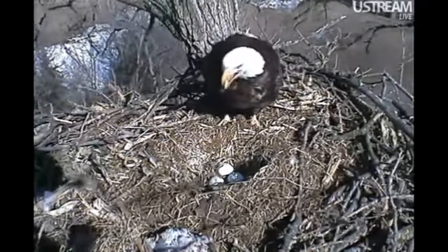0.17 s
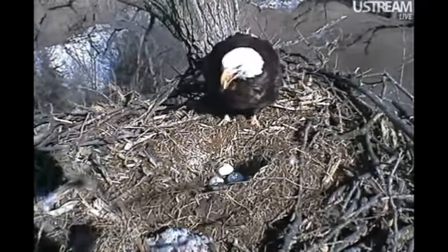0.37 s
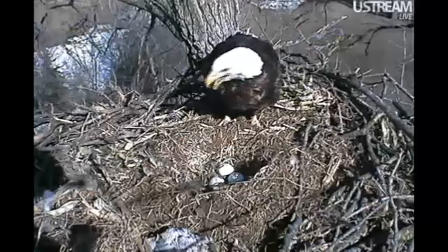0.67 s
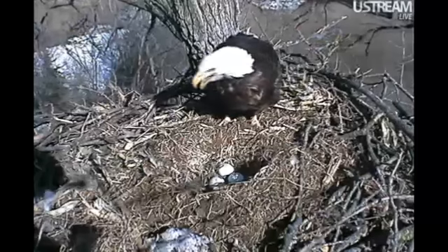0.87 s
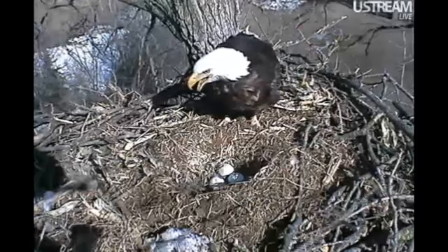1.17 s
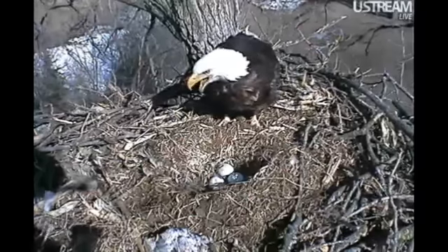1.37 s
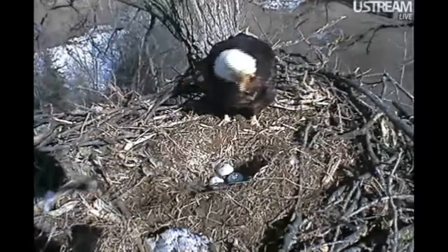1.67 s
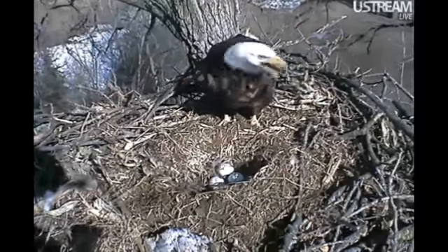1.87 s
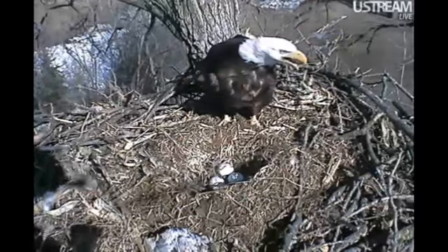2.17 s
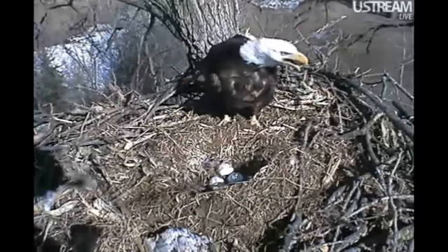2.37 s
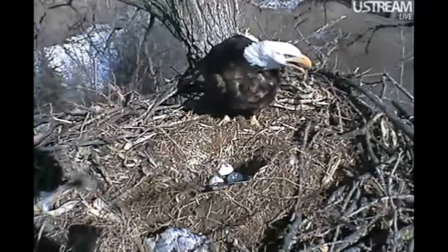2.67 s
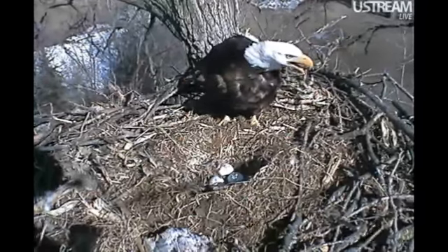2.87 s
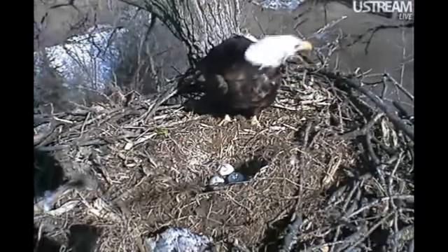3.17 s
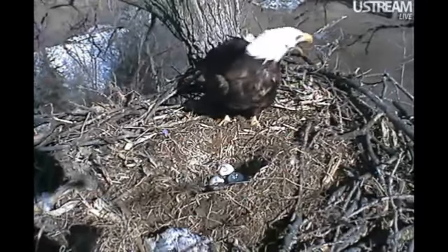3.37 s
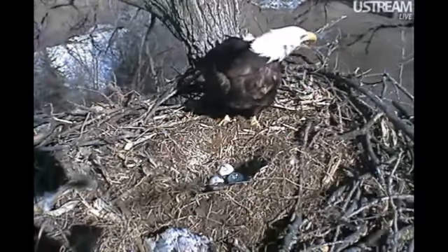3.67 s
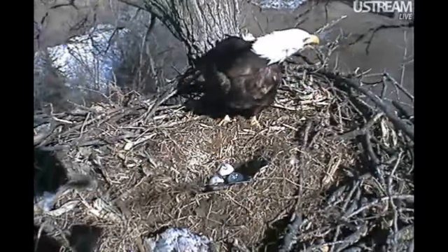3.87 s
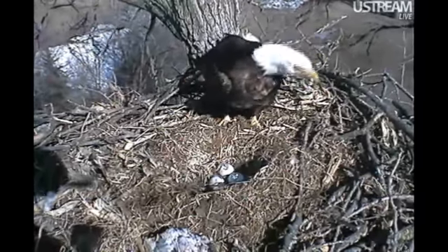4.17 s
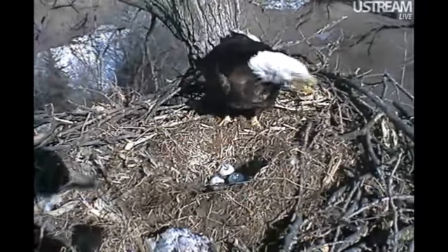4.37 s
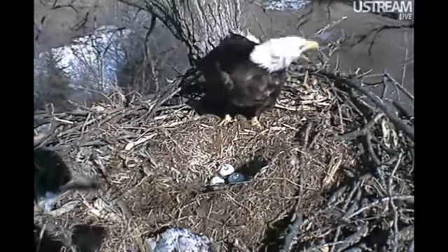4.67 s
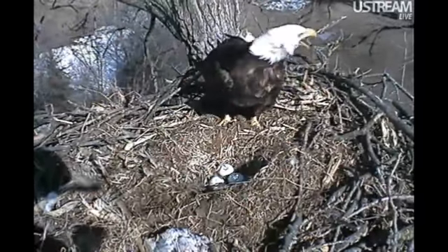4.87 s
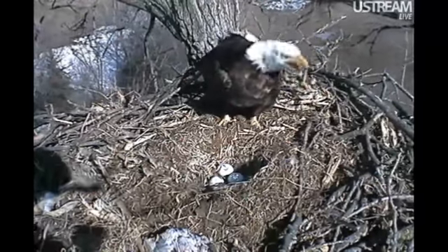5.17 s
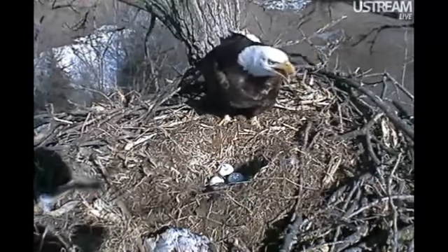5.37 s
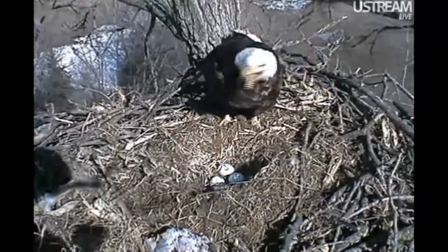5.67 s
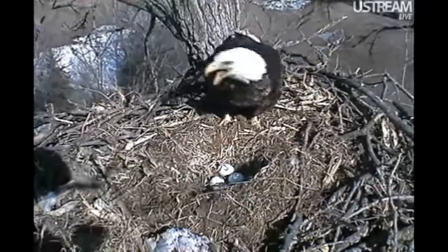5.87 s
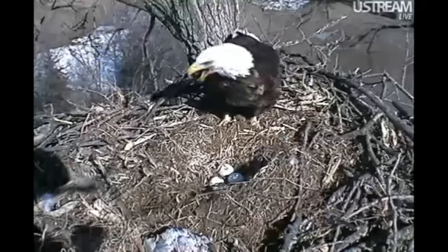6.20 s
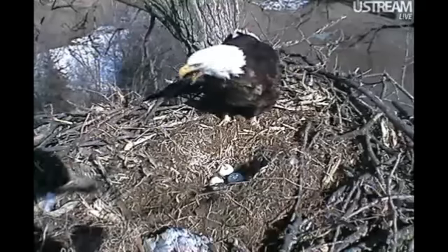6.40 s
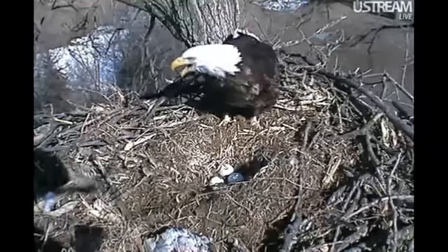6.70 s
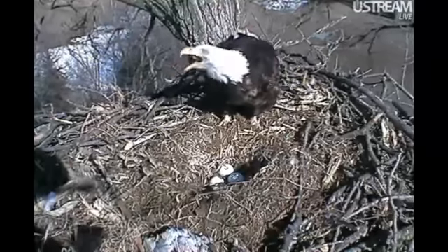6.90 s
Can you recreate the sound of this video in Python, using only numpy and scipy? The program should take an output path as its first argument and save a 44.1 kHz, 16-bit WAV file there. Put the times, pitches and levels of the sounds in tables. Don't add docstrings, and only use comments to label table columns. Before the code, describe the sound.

A bald eagle at its nest gives bouts of rapid, piercing whistled chitters while gusty wind rumbles and overloads a small outdoor microphone.

```python
import sys
import numpy as np
from scipy import signal
from scipy.fft import dct
from scipy.io import wavfile
from scipy.ndimage import uniform_filter1d

SR = 44100
rng = np.random.default_rng(int(sys.argv[2]) if len(sys.argv) > 2 else 0)


def wav_out(sig):
    wavfile.write(sys.argv[1], SR, np.round(np.clip(np.atleast_2d(sig).T, -1, 1) * 32767).astype(np.int16))


def how_loud(loudness_db):
    steps = np.asarray(loudness_db, float) / 20
    return 10 ** steps


N = 310464
RAIL = .026


def butter(x, order, hz, kind="low"):
    return signal.sosfilt(signal.butter(order, hz, kind, fs=SR, output="sos"), x)


def drift(rate_hz):
    r = np.exp(-2 * np.pi * rate_hz / SR)
    slow = signal.lfilter([1], [1, -2 * r, r * r], rng.standard_normal(N + SR))[SR:]
    return slow / slow.std()


# t/s, length/ms, resting f/Hz, level before overload/dB, closing dive/Hz
BOUT_1 = [(0.0005, 8, 3950, -28, 99.8), (.065, 9.5, 4650, -20.5, 60), (.0748, 3.4, 3266, -24.5, 30),
          (.079, 13.2, 4050, -19.5, 99.9), (.158, 12, 4670, -22, 698), (.170, 6.7, 3080, -25, 104),
          (.174, 13.7, 3920, -19.5, 243), (.2545, 6, 4020, -24, 120), (.2605, 7.5, 3800, -22, 300),
          (.2675, 6.5, 3080, -33, 200), (.2755, 8.9, 3830, -30, 300), (.356, 6.8, 4070, -32, 101.3)]
BOUT_2 = [(1.480, 7, 3880, -24, 50), (1.490, 5.7, 3286, -27.5, 31), (1.4945, 8.3, 3930, -21, 60),
          (1.508, 3, 3750, -34, 30), (1.514, 13, 3930, -29, 30), (1.587, 11, 4780, -21, 99.2),
          (1.597, 9.1, 4190, -27.5, 99.9), (1.605, 10, 4950, -27.5, 99), (1.615, 19.4, 4040, -24.5, 401),
          (1.700, 4, 4650, -26, -200), (1.704, 7.5, 5000, -21, 500), (1.711, 3.6, 3706, -14, 30),
          (1.716, 15.7, 4260, -22, 500), (1.731, 7.8, 3150, -34.5, 248), (1.811, 14.5, 3950, -15.5, 120),
          (1.829, 11, 3220, -25, 100), (1.924, 14, 3060, -24, 100), (2.025, 12, 2890, -31, 80)]
BOUT_3 = [(3.1003, 13.4, 4440, -23.5, 500), (3.1157, 6.5, 3950, -19.5, 50.8), (3.121, 16, 4600, -25.5, 600),
          (3.132, 14.3, 3830, -22.5, 353), (3.210, 7.9, 4740, -35, 300), (3.219, 8.2, 4900, -29.5, 690),
          (3.233, 10.5, 4700, -34, 300), (3.246, 6.8, 4720, -32, 300), (3.325, 6, 4450, -23.5, 29.94),
          (3.331, 9, 4800, -25.5, 520), (3.340, 10, 4850, -25, 802.4), (3.354, 16, 3960, -22, 150),
          (3.441, 8, 3750, -31, 30.3), (3.448, 9.3, 4500, -31.5, 500), (3.458, 13, 3800, -21, 80),
          (3.555, 9, 3560, -22, 50), (3.563, 11, 3560, -25, 80), (3.577, 7.2, 3550, -39.5, 99.8)]
BOUT_4 = [(4.475, 6, 3850, -51, 30), (4.482, 12, 3740, -30, 100), (4.498, 18, 3720, -33, 150),
          (4.518, 9, 3500, -48, 30), (4.569, 9, 4850, -31, 600), (4.578, 6.7, 3950, -27.5, 100),
          (4.585, 10, 4820, -27.5, 707), (4.595, 7, 3334, -36, 100.3), (4.602, 14, 3844, -36.5, 504),
          (4.676, 8, 4350, -29.5, 50.2), (4.684, 4, 4900, -37, 30), (4.687, 6, 5600, -38, 200),
          (4.694, 4, 4000, -29.5, 29.56), (4.699, 15, 4750, -35, 1375), (4.772, 8, 4550, -30.5, 600),
          (4.780, 5, 3800, -36, -100), (4.785, 11, 4000, -28, -100), (4.875, 13.5, 3780, -31, 50),
          (4.890, 7, 3600, -36, 30), (4.898, 7, 3650, -35, 99.9), (4.906, 7, 3550, -38, 30),
          (4.974, 11, 3530, -31.5, 30), (4.987, 8, 3520, -33.5, 30), (4.996, 4, 3550, -43, 30),
          (5.060, 12, 2850, -52, 30), (5.078, 8, 2850, -53, 30)]
BOUT_5 = [(5.747, 6, 3920, -45, -100), (5.753, 7.5, 4080, -29, -200), (5.760, 13.3, 4387, -19.5, 30.13),
          (5.774, 25, 3940, -17.5, 50), (5.799, 16, 3760, -17.5, 160), (5.817, 6, 3700, -40, 29.7),
          (5.873, 9, 4750, -24.5, -150), (5.8875, 11.5, 5750, -28, 900), (5.899, 3.8, 3900, -30, 99),
          (5.903, 14, 4800, -24.5, 904), (5.917, 5.9, 3430, -32, 300), (5.984, 6, 4550, -23, -300),
          (5.990, 7, 5100, -29, 1000), (5.997, 3.5, 3950, -24, 30), (6.0005, 12.5, 4820, -18, 900),
          (6.013, 15, 3955, -23, 300), (6.028, 5, 3930, -28.5, 99.6), (6.092, 6.8, 3797, -27.5, 49.34),
          (6.097, 11.4, 4790, -22, 1092), (6.107, 5, 3800, -24, -100), (6.112, 14.5, 3960, -22, 120),
          (6.1941, 15.6, 3760, -23, 260), (6.211, 13.5, 3760, -28, 100), (6.303, 5, 4150, -31, 150),
          (6.308, 10, 3900, -28, 250), (6.319, 6, 3150, -42, 60), (6.326, 11, 3000, -37.5, 100),
          (6.405, 18, 3060, -32, 80), (6.498, 15, 2880, -43.5, 30)]
BOUT_6 = [(6.8726, 15, 5560, -29, 900), (6.8871, 5.5, 4500, -30, 100.3), (6.896, 8.2, 3950, -22, 100.2),
          (6.905, 4.6, 5440, -33.5, 30.1), (6.911, 3.9, 4400, -25, 300), (6.916, 4.6, 3900, -22, 29.9),
          (6.9195, 3.7, 4800, -35, 98.2), (6.924, 4.7, 4600, -24, 198.5), (6.93, 7.5, 4500, -28.5, 30),
          (6.94, 3.9, 4640, -33, 300), (7.003, 4, 5100, -25.5, 907), (7.005, 6, 4250, -27.5, 198),
          (7.014, 3.7, 4300, -24.5, 506), (7.021, 4, 4000, -29.5, 1190), (7.032, 5, 2600, -30, 100),
          (7.037, 3, 4100, -34, 300)]


def strokes(rows):
    scoop_share, scoop_max_ms, dive_share, dive_max_ms = .24, 2.8, .33, 5.8
    join_ms = 3
    fresh_ms, fresh_scoop_hz, fresh_loss_db = 2.0, 160, 6.5
    slide_loss_db, slide_loss_db_per_khz = 2.5, 7.5
    arch_max_hz, arch_share, sag_hz_per_ms = 120, .35, 9
    release_ms, release_loss_db = 7, 18.5
    crack_ms, crack_hz, crack_db = 5, 2600, -45

    steps, last_s, last_hz, last_db = [], -1, 0, 0
    for s, ms, hz, db, dive_hz in rows:
        scoop_ms = min(scoop_share * ms, scoop_max_ms)
        dive_ms = min(dive_share * ms, dive_max_ms)
        from_hz = last_hz
        loss_db = slide_loss_db + slide_loss_db_per_khz * abs(hz - from_hz) / 1000
        gap_s = s - last_s
        if gap_s * 1000 > join_ms:
            from_hz, loss_db = hz - fresh_scoop_hz, fresh_loss_db
            scoop_ms = min(scoop_ms, fresh_ms)
            if last_s > 0:
                trail_ms = min(release_ms, gap_s * 400)
                steps.append((last_s, trail_ms, last_hz, last_hz, last_db - release_loss_db))
            if 4500 < hz < 5300 and gap_s > crack_ms / 500:
                steps.append((s - crack_ms / 1000, crack_ms, hz + crack_hz, hz, crack_db))

        arch_hz = arch_max_hz * min(abs(hz - from_hz) / fresh_scoop_hz, 1)
        rest_ms = ms - scoop_ms - dive_ms
        climb_ms = arch_share * rest_ms
        sag_ms = rest_ms - climb_ms
        sagged_hz = hz - sag_hz_per_ms * sag_ms
        dive_loss_db = slide_loss_db + slide_loss_db_per_khz * abs(dive_hz) / 1000
        last_s, last_hz, last_db = s + ms / 1000, sagged_hz - dive_hz, db
        steps += [(s, scoop_ms, from_hz, hz - arch_hz, db - loss_db),
                  (s + scoop_ms / 1000, climb_ms, hz - arch_hz, hz, db),
                  (s + (scoop_ms + climb_ms) / 1000, sag_ms, hz, sagged_hz, db),
                  (last_s - dive_ms / 1000, dive_ms, sagged_hz, last_hz, db - dive_loss_db)]
    return steps


# t/s, f/Hz, level/dB
SQUEAL = [
    (6.945, 8240, -50),
    (6.953, 8380, -39.5),
    (6.962, 7450, -28),
    (6.968, 7600, -35),
    (6.979, 8700, -40),
    (6.985, 7980, -40.5),
    (6.99, 6950, -27),
    (6.994, 5820, -30),
    (6.998, 3620, -25),
]


def squeal():
    steps = []
    for (s, hz, db), (next_s, next_hz, next_db) in zip(SQUEAL, SQUEAL[1:]):
        steps.append((s, (next_s - s) * 1000, hz, next_hz, (db + next_db) / 2))
    return steps


# multiple of the whistle, level/dB
OVERTONES = [
    (2, -9),
    (3, -30),
]


def whistle(steps, glide_ms=0.58, edge_ms=0.82, breath_db=-24, rasp_db=-11):
    pitch_hz, gain = np.full(N, 3500.), np.zeros(N)
    for s, ms, start_hz, end_hz, db in steps:
        at = round(s * SR)
        pitch_hz[at:at + SR // 10] = end_hz
        span = slice(at, min(at + round(ms * SR / 1000) + 1, N))
        pitch_hz[span] = np.linspace(start_hz, end_hz, span.stop - at)
        gain[span] = how_loud(db)
    gain = uniform_filter1d(gain, size=max(int(edge_ms * SR / 1000), 1))

    effort = np.minimum(gain / RAIL / 2, 1)
    shaky = (1 - effort) * (pitch_hz < 6200)
    waver = 1 + (.004 + .008 * shaky) * drift(180)
    gain = gain * how_loud((1 + 3 * shaky) * drift(220))
    pitch_hz = uniform_filter1d(pitch_hz, size=max(int(glide_ms * SR / 1000), 1)) * waver
    phase = 2 * np.pi * np.cumsum(pitch_hz) / SR

    breath = butter(rng.standard_normal(N), 2, 2500, "high")
    rasp = butter(rng.standard_normal(N), 2, 1300)
    rasp = rasp / rasp.std()
    rough_share = np.clip((pitch_hz - 4150) / 400, 0, 1)
    rich = effort * (1 - .7 * rough_share * (1 - rasp))
    overtones = sum(how_loud(db) * np.cos(k * phase) for k, db in OVERTONES)
    tone = np.sin(phase) + rich * overtones
    tone = tone * (1 + how_loud(rasp_db) * shaky * rasp)
    return gain * (tone + how_loud(breath_db) * effort * breath)


# t/s, length/ms, start f/Hz, # end f/Hz,
# peak level/dB
SECOND = [(1.481, 5, 4700, 4800, -37), (1.515, 10, 4500, 4700, -38), (.352, 8, 4500, 3500, -39),
          (1.829, 10, 5654, 5770, -40), (1.923, 7, 3650, 3600, -33), (4.772, 7, 3800, 3850, -33),
          (4.668, 8, 5300, 5400, -44), (3.443, 6, 4450, 4478, -31), (1.588, 11.3, 3800, 3904, -38),
          (4.481, 8.6, 4300, 4300, -43), (4.569, 5, 3600, 3900, -44), (5.874, 10, 3700, 3800, -40.5),
          (6.096, 9.1, 3750, 3805, -36.5), (6.886, 3.9, 3600, 2600, -38), (4.79, 13, 4500, 4520, -36),
          (4.803, 17, 3150, 3050, -53), (4.661, 7, 7600, 5500, -54), (4.6915, 4, 4800, 4200, -36),
          (4.903, 10, 2900, 2900, -42), (5.746, 8, 2800, 2950, -53), (5.765, 10, 4750, 4900, -34),
          (5.8815, 6, 5900, 3700, -33), (5.817, 6.9, 5170, 4870, -49.5), (5.858, 7, 2400, 2700, -51),
          (5.865, 4, 10500, 7500, -47), (5.975, 9, 2200, 3000, -50), (3.209, 44, 4400, 4300, -47),
          (6.086, 3, 2330, 2900, -48), (6.089, 4, 8500, 4500, -44), (6.223, 7, 3050, 2800, -38),
          (6.408, 13, 3750, 3600, -36), (6.955, 22, 2480, 2720, -45.5)]


def second_strand():
    return whistle(sorted(SECOND))


def splinters(rows, decay_ms=6, loss_db=15, full_hop_hz=800):
    kicks, last_hz = np.zeros(N), 0
    for s, ms, hz, db, dive_hz in rows:
        kicks[round(s * SR)] = how_loud(db - loss_db) * min(abs(hz - last_hz) / full_hop_hz, 1)
        last_hz = hz
    t = np.arange(SR // 30) / SR
    noise = butter(rng.standard_normal(N), 2, [2600, 5500], "band")
    return signal.fftconvolve(kicks, np.exp(-1000 * t / decay_ms))[:N] * noise / noise.std()


# from t/s, to t/s, delay/s, level/dB
ECHOES = [
    (0, 1.9, .040, -38),
    (0, 1.9, .046, -40),
    (1.9, 5.5, .058, -29),
    (1.9, 5.5, .064, -32),
    (1.9, 5.5, .034, -33),
    (5.5, 7.04, .036, -37),
    (5.5, 7.04, .043, -40),
]


def echoes(x, dull_hz=5000, flutter_db=5):
    x = butter(x, 4, dull_hz)
    t, out = np.arange(N) / SR, 0
    for from_s, to_s, delay_s, db in ECHOES:
        facing = x * (t >= from_s) * (t < to_s)
        delayed = np.pad(facing, (round(delay_s * SR), 0))[:N]
        out = out + how_loud(db) * delayed * how_loud(flutter_db * drift(120))
    return out


def tree(x, level_db=-29, first_ms=6, t60_s=.32, dull_hz=5100):
    t = np.arange(SR // 4) / SR
    scatter = rng.standard_normal(len(t)) * how_loud(-60 * t / t60_s) * (t > first_ms / 1000)
    return how_loud(level_db) * signal.fftconvolve(butter(x, 4, dull_hz), scatter / np.linalg.norm(scatter))[:N]


# t/s, level/dB
GUSTS = [(0.0, -28), (1.0, -26.5), (1.35, -29.5), (1.9, -29), (2.3, -25.5), (2.75, -28.5), (3.25, -26),
         (3.9, -29.5), (4.25, -26.5), (4.376, -36), (5.0, -35.6), (5.3, -43), (5.49, -37.5), (5.62, -41.5),
         (6.0, -45), (6.5, -34), (6.76, -38), (7.04, -28.5)]
# f/Hz, level per Hz/dB
WIND = [(60, -16), (120, -2), (180, -1), (300, -3), (500, -1.5), (750, -3.5), (1000, -13), (1400, -30.5),
        (2200, -29.5), (4000, -34.5), (8000, -46.5), (13000, -53.5)]


def wind(lull_db=-41, bass_lift=0.19, flutter_db=1.0, patchy_db=1.9):
    level_db = np.interp(np.arange(N) / SR, *np.transpose(GUSTS))
    hz, colour_db = np.transpose(WIND)
    edges_hz = 20 * 2 ** np.arange(0, 9.6, .5)
    white, together, out = rng.standard_normal((2, N)), drift(24.0), 0
    for k, (low_hz, high_hz) in enumerate(zip(edges_hz, edges_hz[1:])):
        band = butter(white[k % 2], 3, [low_hz, high_hz], "band")
        centre_hz = np.sqrt(low_hz * high_hz)
        tilt_db = bass_lift * (level_db - lull_db) * np.log2(400 / np.clip(centre_hz, 150, 1600))
        band_db = np.interp(np.log(centre_hz), np.log(hz), colour_db)
        out = out + band * how_loud(band_db + tilt_db + patchy_db * drift(6.8))
    loudness = np.sqrt(uniform_filter1d(out ** 2, size=SR))
    return out / loudness * how_loud(level_db + flutter_db * together)


# t/s, level/dB
AIR = [(0.0, -56.5), (0.39, -57.5), (0.94, -49), (1.17, -59.5), (1.41, -70.5), (2.47, -52), (2.6, -57.5),
       (3.43, -52.5), (4.49, -63.5), (4.85, -65), (5.33, -95), (6.0, -72), (6.3, -89), (6.84, -68),
       (6.95, -54), (6.99, -48), (7.04, -52)]


def branches(rumble_db=-41, rumble_follows=.2, lumps_db=3):
    t, out = np.arange(N) / SR, 0
    hiss_db = np.interp(t, *np.transpose(AIR))
    rumble_db = rumble_db + rumble_follows * np.interp(t, *np.transpose(GUSTS)) + lumps_db * drift(2.5)
    for band_hz, level_db in ([2200, 6000], hiss_db), ([52, 120], rumble_db):
        noise = butter(rng.standard_normal(N), 2, band_hz, "band")
        out = out + noise / noise.std() * how_loud(level_db)
    return out


def scene():
    rows = [row for bout in (BOUT_1, BOUT_2, BOUT_3, BOUT_4, BOUT_5, BOUT_6) for row in bout]
    call = whistle(sorted(strokes(rows) + squeal())) + second_strand()
    scattered = splinters(rows) + echoes(call) + tree(call)
    return (call + scattered + wind() + branches())[None]


def overload(x, hardness=35.0, kick=0.09, lean=0.46):
    bias = butter(np.abs(butter(x, 2, 2000, "high")), 2, 60)
    x = x + kick * bias - lean * butter(bias, 1, 3)
    return x / (1 + np.abs(x / RAIL) ** hardness) ** (1 / hardness)


def smear(x, tail_db=-10, above_hz=6200, t60_s=.075, kept=.92, scattered=.2, scatter_hz=700):
    t = np.arange(SR // 20) / SR
    tail = rng.standard_normal(len(t)) * how_loud(-60 * t / t60_s)
    treble = signal.sosfiltfilt(signal.butter(4, above_hz, "high", fs=SR, output="sos"), x[0])
    noise = butter(rng.standard_normal(N), 2, scatter_hz)
    rough = treble * (kept + scattered * noise / noise.std())
    return x - treble + rough + how_loud(tail_db) * signal.fftconvolve(rough, tail / np.linalg.norm(tail))[:N]


def coarse_rounding(x, bass_db=-13.5, quiet_db=-100, valley_db=-16, hole_db=-16, size=512, width=8):
    window = np.sin(np.pi * (np.arange(2 * size) + .5) / (2 * size))
    padded = np.pad(x[0], (size, 2 * size - N % size))
    frames = np.lib.stride_tricks.sliding_window_view(padded, 2 * size)[::size] * window
    a, b, c, d = np.split(frames, 4, axis=1)
    values = dct(np.c_[-c[:, ::-1] - d, a - b[:, ::-1]], 4, norm="ortho")
    hz = np.arange(size) * SR / 2 / size

    def spread(bins):
        return np.sqrt(uniform_filter1d(values ** 2, size=bins, axis=1))

    near, masked = spread(10), spread(40)
    far = spread(110) * (hz > 4700)
    coarse_db = np.interp(hz, [1500, 4500, 6000], [bass_db, -10, -7])
    short_db = uniform_filter1d(rng.normal(0, 7, (len(values), size // width)), size=4, axis=0)
    short_db = np.repeat(short_db, width, axis=1) * (hz > 5200)
    poor = (short_db > 3.6) & (near < 1.2 * masked)
    valley = near < far * how_loud(valley_db + short_db)
    values = values * np.where(poor | valley, how_loud(hole_db), 1)

    step = masked * how_loud(coarse_db + short_db / 2) + how_loud(quiet_db)
    u, v = np.split(dct(np.round(values / step) * step, 4, norm="ortho"), 2, axis=1)
    frames = np.c_[v, -v[:, ::-1], -u[:, ::-1], -u] * window
    return (frames[:-1, size:] + frames[1:, :size]).ravel()[None, :N]


def low_pass(x):
    return signal.sosfilt(signal.butter(12, 13160, fs=SR, output="sos"), x)


def record(dry):
    x = coarse_rounding(smear(overload(dry)))
    x = butter(x, 1, 1.2, "high")
    x = signal.sosfilt(signal.ellip(10, .5, 75, 11850, fs=SR, output="sos"), x)
    return low_pass(x)


dry = scene()
out = record(dry)
wav_out(out)
```